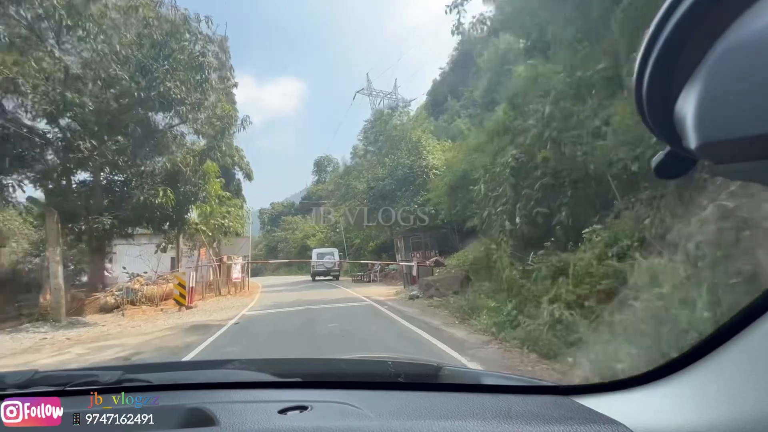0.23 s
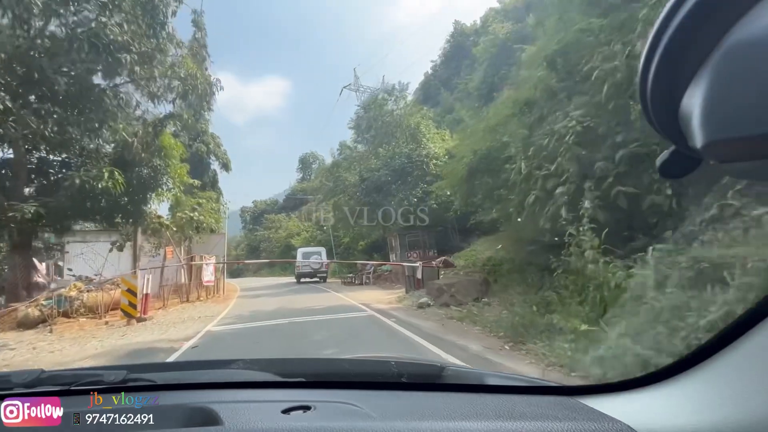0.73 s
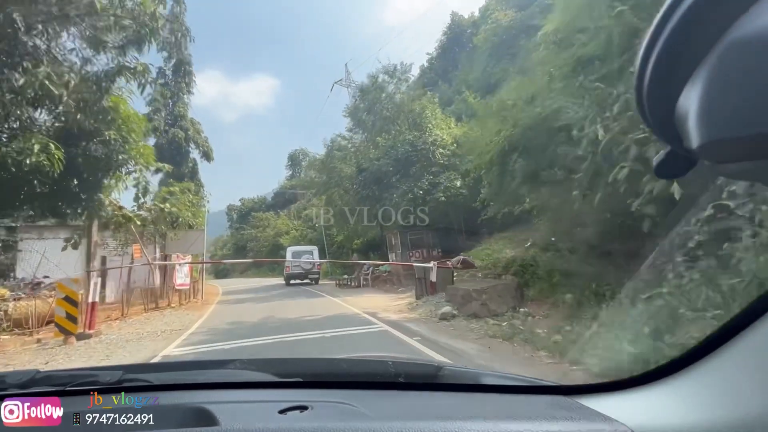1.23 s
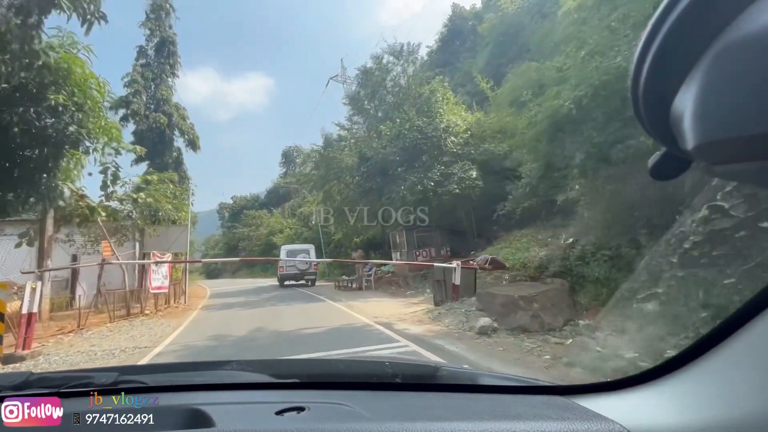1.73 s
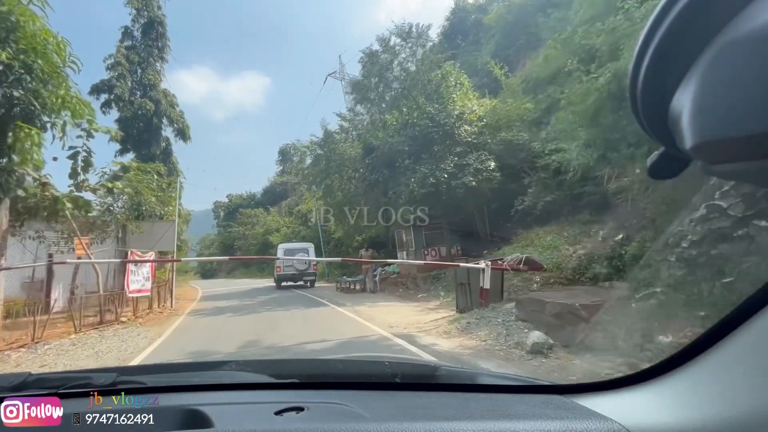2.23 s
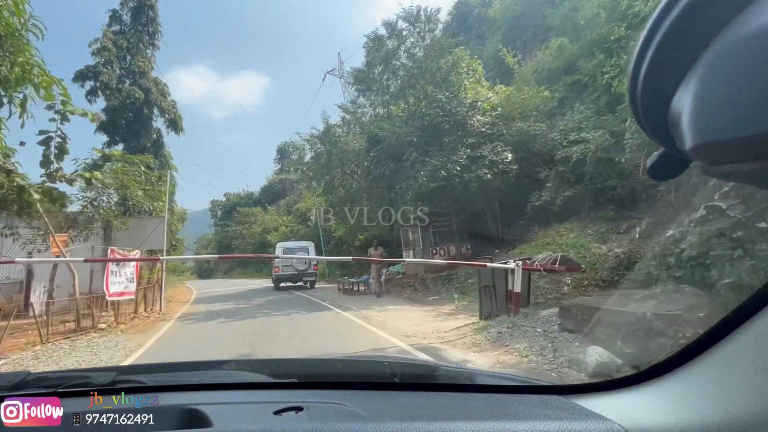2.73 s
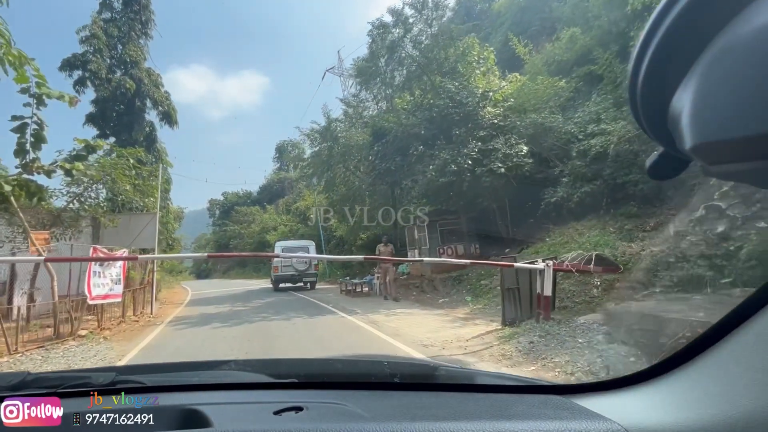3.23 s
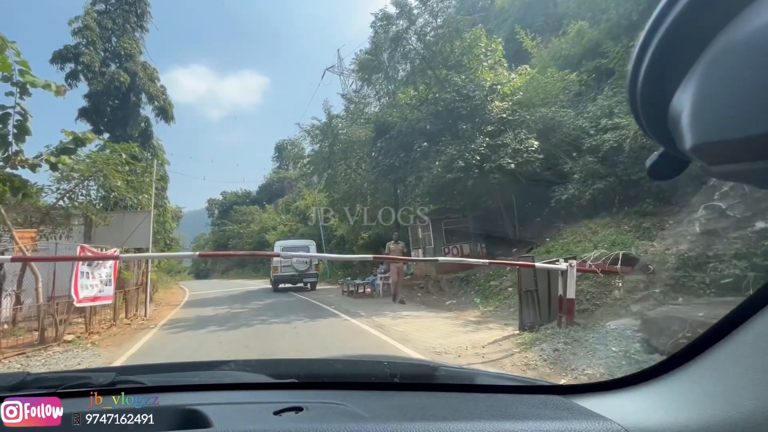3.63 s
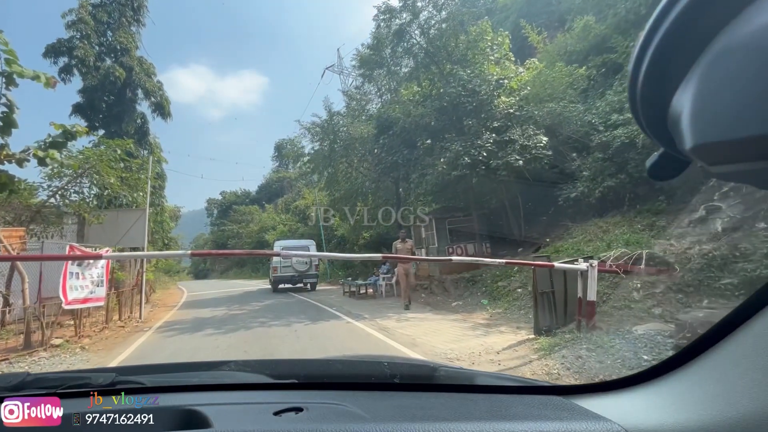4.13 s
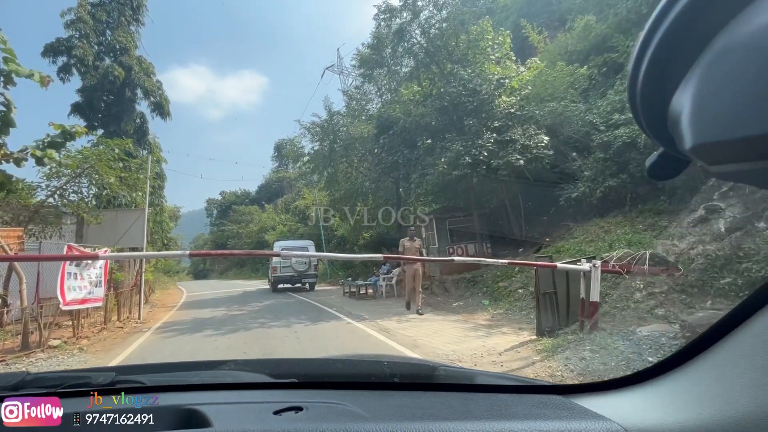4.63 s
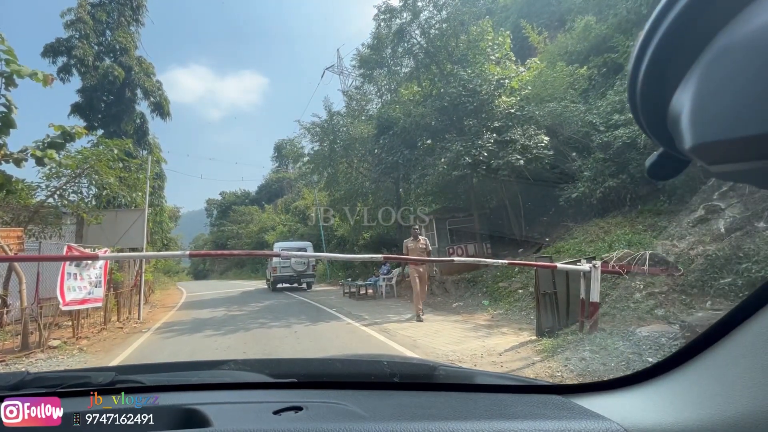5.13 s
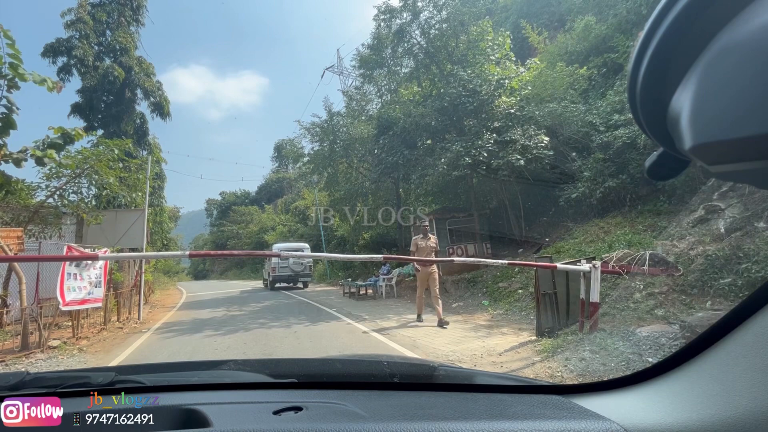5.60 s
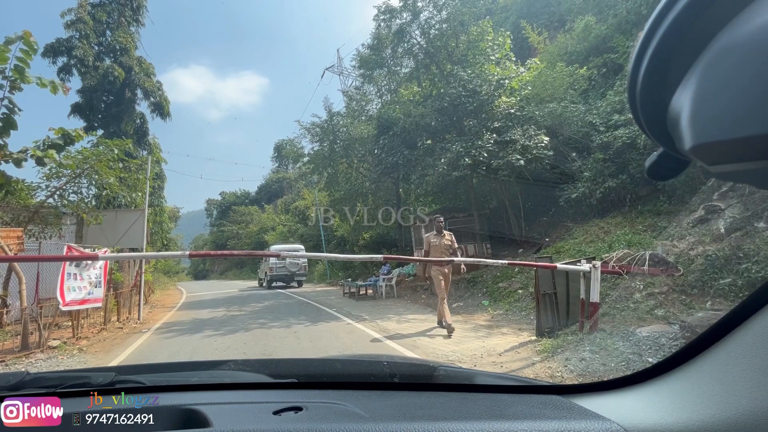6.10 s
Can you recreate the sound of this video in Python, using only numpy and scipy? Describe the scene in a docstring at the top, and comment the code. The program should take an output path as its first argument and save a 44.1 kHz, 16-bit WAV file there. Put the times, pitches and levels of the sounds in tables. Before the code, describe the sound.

Close inside a car cabin, deep road and engine rumble gradually fades as the car slows. A few faint trim ticks, then a soft airy hiss swells with two low taps and a higher one. The window breaks loose with a crackling thump, slides down with a hissing rub and motor hum, and lands with a second thump. Faint insect chirps follow.

```python
"""Inside a car that rolls to a stop: road rumble, as filtered noise, fades while modes of the trim click.
An airy hiss of broadband noise swells as the car slows, with two low taps and a higher one, then dies away.
The door glass breaks free of its seal with a thump of ringing panel modes and a crackle,
slides down as friction noise with a narrow-band song, over the sinusoidal hum of the motor,
and lands on its stop with a second thump; then faint insects chirp outside as resonant noise."""
import sys
import numpy as np
from scipy import signal
from scipy.fft import rfft, irfft
from scipy.io import wavfile
from scipy.ndimage import uniform_filter1d

SR = 44100
rng = np.random.default_rng(int(sys.argv[2]) if len(sys.argv) > 2 else 0)


def master(y):
    """Save y as 16-bit WAV."""
    cut = np.clip(np.atleast_2d(y).T, -1, 1)
    pcm = np.round(cut * 32767)  # scale
    wavfile.write(sys.argv[1], SR, pcm.astype(np.int16))


def rack_gain(trim_db):
    """Turn a fader trim in dB into the linear factor to multiply a signal by."""
    fader = np.asarray(trim_db, float)
    return 10 ** (fader / 20)


N = 280564
T = np.arange(N) / SR   # time [s]

# Spectra of the ride noises: (frequency [Hz], density [dB per Hz])
RUMBLE_SPECTRUM = [(12, -49.5), (20, -9.5), (48, 3), (102, -1.5), (161, -15), (193, -14), (220, -24),
                   (290, -53), (480, -120)]
DRONE_SPECTRUM = [(88, -27.5), (150, -7), (306, -8), (393, -17.5), (450, -15.5), (560, -21), (700, -39),
                  (980, -40.5), (1650, -120)]
AIR_SPECTRUM = [(350, -23), (600, -1), (1230, -2), (1360, -2), (2630, -12.5), (3100, -20.5), (4460, -24),
                (6020, -22.5), (12000, -47.5), (15600, -99.5), (22000, -120)]
# Road rumble as the car slows, rising briefly after the first thump: (time [s], level [dB])
ROAD_LEVEL = [(0, -25), (1.2, -31), (1.7, -30.5), (3.3, -36), (3.7, -33), (4.2, -42.5), (5.2, -42),
              (6.36, -43)]
# Thin cabin air noise: (time [s], level [dB], brightness [dB per octave])
CABIN_AIR = [(0, -60.5, -4), (1.7, -61.5, -1.5), (3.7, -58, 0), (4.2, -59.5, 1.5), (6.36, -62.5, 2)]
# Insect chirps: (time [s], level before the left-right lean [dB], length [s])
CHIRPS = [(5.524, -70.5, 0.088), (5.774, -71, 0.047), (6.052, -70.5, .05), (6.342, -70, 0.022)]
# Steady hums: (frequency [Hz], mean level [dB], start [s], stop [s], line width [Hz])
HUM_LINES = [(61, -41, 3.55, 5.3, 3.0), (120, -50, 3.55, 5.3, 4.0), (178, -48, 4.1, 6.4, 2.5),
             (345, -58, 3.6, 4.8, 6.0), (96, -38, 2.3, 3.45, 3.0), (962, -72, 0.9, 2.35, 8.0),
             (968, -69, 2.35, 3.45, 8.0)]
# Airy hiss while slowing: (time [s], level [dB], brightness [dB per octave])
HISS_COURSE = [(1.65, -74, 0), (1.7, -71.5, 1.5), (1.95, -63.5, 1.5), (2.1, -65, 1), (2.35, -60, 3.5),
               (2.53, -52, 1.5), (2.9, -52.5, -2), (2.94, -56, -5), (3.2, -65.5, -5.5), (3.4, -89, 3)]
# Faint rustles: (time of maximum [s], level [dB], rise and fall [dB per s], brightness [dB per octave])
RUSTLES = [(.56, -73, 39, 0), (.92, -75, 37, 0)]
# Spectrum of the airy hiss: (frequency [Hz], density [dB per Hz])
HISS_SPECTRUM = [(1180, -21.5), (2000, -4.5), (2660, -5), (3300, -2.5), (3700, 1), (7230, -1),
                 (12400, -11.5), (14200, -19)]
# Narrow scuffs: (time of maximum [s], level before the lean [dB], rise and fall [dB per s],
# frequency [Hz], t60 of each resonator [s])
SCUFFS = [(1.2, -66, 71, 2400, .002), (1.2, -73.5, 121, 5100, 0.0017), (5.12, -61.5, 44, 2280, 0.013),
          (5.55, -68.5, 22, 2830, 0.0023), (6.08, -61.5, 25, 2800, 0.002)]
# Pitched taps: (time [s], level [dB], frequency [Hz], frequency ratio of second mode [1],
# second mode's level [dB], t60 of each resonator [s])
TAPS = [(2.061, -36.5, 490, 1.4, -12.5, 0.031), (2.076, -40.5, 484, 1.7, -10, 0.026),
        (3.001, -38.5, 2900, 0.78, -7, 0.007)]
# Clicks and cracks: (time [s], level [dB], centre [Hz], fall from centre [dB per octave], t60 at 3 kHz [s])
CLICKS = [(0.141, -42.5, 8040, 4, 0.088), (0.549, -46.5, 6200, 1, 0.051), (0.634, -36, 6250, 1.5, 0.057),
          (3.414, -40.5, 1800, -0.5, 0.089), (3.422, -25.5, 1520, 3.5, 0.088),
          (3.431, -29, 3600, 4.5, 0.091), (3.453, -15.5, 4500, 13, .07), (3.46, -22, 1030, 3.5, 0.088),
          (3.477, -26, 3940, 14, 0.059), (3.494, -31, 4380, 10, 0.11), (3.532, -35.5, 2200, 6, 0.085),
          (3.559, -26.5, 4200, 8, 0.079), (3.58, -30, 2300, 3, .09), (5.297, -23.5, 3700, 8, 0.12),
          (5.306, -29, 1310, 7.5, 0.085), (5.335, -40, 1300, 7, 0.086), (5.925, -33.5, 1500, 1.5, 0.065),
          (5.94, -30.5, 390, 13, 0.13), (5.996, -49, 6200, 9, .03)]
# Spectrum of the click noise: (frequency [Hz], density [dB per Hz])
CLICK_SPECTRUM = [(150, -32.5), (250, 6), (760, -9), (1590, -10.5), (2160, -17.5), (2350, -15),
                  (3180, -20.5), (3520, -16.5), (5830, -19), (9500, -28.5), (12300, -45.5), (14000, -60)]
# Modes of the trim: (frequency [Hz], level [dB], t60 [s])
TRIM_MODES = [(521, -10, 0.046), (1330, -7.5, 0.013), (2890, -12.5, 0.015), (4370, -12, 0.012),
              (5300, -15, 0.0076), (6250, -17, 0.011), (8930, -12.5, 0.0042)]
# Jolts to the door: (time [s], level [dB], softness cut [Hz], way the panel is pushed)
JOLTS = [(3.434, -17, 200, "out"), (3.445, -16, 300, "in"), (3.463, -8.5, 398, "in"),
         (3.477, -10.5, 254, "out"), (3.565, -18.5, 206, "in"), (3.578, -21.5, 201, "out"),
         (5.302, -19, 350, "out"), (5.314, -11.5, 252, "in"), (5.334, -12, 120, "in"),
         (5.383, -17.5, 100, "in"), (5.431, -26, 149, "in"), (5.561, -26, 99, "in"),
         (5.94, -29.5, 500, "out")]
# Modes of the door: (frequency [Hz], level glass up [dB], level glass down [dB], t60 of each resonator [s])
DOOR_MODES = [(52.8, -5.5, 3.5, 0.14), (61.2, 1, -5, 0.2), (95.5, 0, -4.5, 0.091),
              (128.8, -1.5, -2.5, 0.097), (172.2, -7.5, -4, 0.089), (270, -6.5, -16, 0.093),
              (360, -5, -15, 0.081), (482, -36, -4, 0.087)]
# Song of the seal: (time [s], level before the left-right lean [dB], centre [Hz])
SEAL_SONG = [(3.5, -74, 4206), (4.05, -51.5, 4300), (4.72, -53, 4244), (5.03, -61.5, 4850),
             (5.16, -75, 4980)]
# Spectrum of the sliding friction: (frequency [Hz], density [dB per Hz])
SLIDE_SPECTRUM = [(600, -33), (850, -8), (1000, -9), (1190, -13), (1480, -5), (1990, -9.5), (2820, -6.5),
                  (4320, -2.5), (6300, -4), (6900, -9), (8930, -12), (12200, -26.5), (14200, -33)]
# Stereo field in the cabin: (frequency [Hz], left-right likeness [1])
LIKENESS = [(60, 0.9), (150, 0.93), (370, 0.38), (910, -0.81), (2240, 0.055), (5540, -0.22), (13700, 0.59)]
# Balance of the two microphones: (frequency [Hz], left over right [dB])
LEAN = [(60, -1), (150, 2), (370, -2), (910, 1), (2240, 3), (5540, 11.5), (13700, -8)]

SLIDE_FROM_S, SLIDE_TO_S = 3.44, 5.31   # the glass travels
CABIN_RIPPLE_DB, RIPPLE_WIDTH_HZ = 2.1, 40
OUT_OF_STEP = 0.5   # share of the side signal in quadrature with the mid


def rms_one(x):
    """Normalisation: scale a signal to rms 1."""
    return x / np.sqrt(np.mean(x ** 2) + 1e-20)


def in_time(rows):
    """Linear interpolation: join the columns of a table by straight lines in time."""
    s, *columns = np.transpose(rows)
    return [np.interp(T, s, column) for column in columns]


def at_hz(points, hz):
    """Logarithmic frequency: interpolate a spectrum along octaves."""
    table_hz, values = np.array(points).T
    return np.interp(np.log(hz), np.log(table_hz), values)


def lean_gain(hz):
    """Level difference: left and right gains share the balance of the microphones equally."""
    return rack_gain(at_hz(LEAN, hz) / 2 * np.array([[1], [-1]]))


def drift(rate):
    """Low-passed random process: critically damped noise of corner rate [Hz], spread 1."""
    every = 40   # samples between slow values
    r = np.exp(-2 * np.pi * every * rate / SR)
    noise = rng.standard_normal(N // every + 2002)
    slow = signal.lfilter([1], [1, -2 * r, r * r], noise)[2000:]   # past the onset transient
    return np.interp(np.arange(N) / every, np.arange(len(slow)), rms_one(slow))


def resonate(x, hz, t60):
    """Damped oscillator: a unit impulse excites a decaying sine of initial height 1."""
    r = rack_gain(-60 / (t60 * SR))
    w = 2 * np.pi * hz / SR
    return signal.lfilter([0, np.sin(w)], [1, -2 * r * np.cos(w), r * r], x + 1e-18)


def bands(spectrum, per_octave):
    """Spectral shaping: yield (centre [Hz], stereo noise band); the mid of their sum has rms 1."""
    hz = np.maximum(np.fft.rfftfreq(N, 1 / SR), 1)
    alike = np.clip(at_hz(LIKENESS, hz), -0.95, 0.98)
    lean = rack_gain(at_hz(LEAN, hz) / 2)
    mid, side = rfft(rng.standard_normal((2, N)))
    # part of the side is the same sound a quarter turn out of step: two ports in one sound field
    side = 1j * OUT_OF_STEP * mid + np.sqrt(1 - OUT_OF_STEP ** 2) * side
    # crowded cabin modes ripple the spectrum
    ripple = uniform_filter1d(rng.standard_normal(len(hz)), size=round(RIPPLE_WIDTH_HZ * N / SR))
    colour = rack_gain(at_hz(spectrum, hz) + CABIN_RIPPLE_DB * rms_one(ripple))
    low, high = spectrum[0][0], spectrum[-1][0]
    colour = colour * (hz > low) * (hz < high)
    pair = np.sqrt(1 + alike) * mid + np.sqrt(1 - alike) * side * [[1], [-1]]
    mid_power = (lean ** 2 + lean ** -2 + 2 * alike) / 2
    pair = pair * [lean, 1 / lean] / np.sqrt(mid_power) * colour
    pair = pair * N / np.sqrt(2 * np.sum(np.abs(pair.mean(axis=0)) ** 2))
    place = per_octave * np.log2(hz / low)
    for k in range(int(per_octave * np.log2(high / low)) + 2):
        share = np.cos(np.pi / 2 * np.clip(place - k, -1, 1)) ** 2   # overlapping bands sum to one
        yield low * 2 ** (k / per_octave), irfft(pair * share, N)


def wash(spectrum, level_db, tilt_db, patchy_db):
    """Modulated noise: octave bands flicker together and alone; tilt pivots on the spectral peak."""
    together = drift(8.6)
    pivot = max(spectrum, key=lambda point: point[1])[0]
    out = 0
    for hz, band in bands(spectrum, 0.99):
        flicker_db = patchy_db * (together + drift(4.1))
        out = out + band * rack_gain(level_db + tilt_db * np.log2(hz / pivot) + flicker_db)
    return out


def ride():
    """Structure-borne noise: tyres and engine pass through the body as rumble, drone and thin air noise."""
    rumble_db, = in_time(ROAD_LEVEL)
    air_db, air_tilt_db = in_time(CABIN_AIR)
    drone_db = -44 + 0.17 * (rumble_db - rumble_db.mean())   # follows a share of the rumble's swing
    rumble = wash(RUMBLE_SPECTRUM, rumble_db, 0.96, patchy_db=0)
    drone = wash(DRONE_SPECTRUM, drone_db, 0, patchy_db=1.12)
    return rumble + drone + wash(AIR_SPECTRUM, air_db, air_tilt_db, patchy_db=0.4)


def insect():
    """Resonant filtering: two resonators near 6 kHz turn noise into short shrill chirps, mostly left."""
    buzz = resonate(resonate(rng.standard_normal(N), 6500, 0.0018), 5950, 0.0018)
    shape = 0
    for s, db, length in CHIRPS:
        shape = shape + rack_gain(db) * np.sin(np.pi * np.clip((T - s) / length, 0, 1))
    return rms_one(buzz) * shape * rack_gain([[3.0], [-5.0]])


def hums():
    """Line spectra: motor and engine sound as sines that waver in phase and level."""
    out = 0
    for hz, level_db, start, stop, width in HUM_LINES:
        on = uniform_filter1d(1. * (T > start) * (T < stop), size=4000)
        phase = 2 * np.pi * np.cumsum(hz + width / 2 * drift(6.06)) / SR
        height = np.sqrt(2) * rack_gain(level_db + 2.5 * drift(5.7))
        out = out + on * height * np.sin(phase + [[0], [0.3]])   # right leads by 0.3 rad
    return out


def hiss():
    """Selection of the strongest: faint rustles and the slowing swell; the loudest sets level and colour."""
    level_db, tilt_db = in_time(HISS_COURSE)
    level_db = np.where((T > HISS_COURSE[0][0]) & (T < HISS_COURSE[-1][0]), level_db, -120)
    for s, db, slope_db, bright_db in RUSTLES:
        rustle_db = db - slope_db * np.abs(T - s)
        tilt_db = np.where(rustle_db > level_db, bright_db, tilt_db)
        level_db = np.maximum(rustle_db, level_db)
    level_db, tilt_db = (uniform_filter1d(x, size=600) for x in (level_db, tilt_db))
    return wash(HISS_SPECTRUM, level_db, tilt_db, patchy_db=0.5)


def scuffs():
    """Resonant filtering: noise in one narrow resonance each swells and fades exponentially."""
    out = 0
    for s, db, slope_db, hz, t60 in SCUFFS:
        rub = resonate(resonate(rng.standard_normal((2, N)), hz, t60), hz, t60)
        out = out + rack_gain(db - slope_db * np.abs(T - s) + [[3.0], [-2.0]]) * rms_one(rub)
    return out


def taps():
    """Impulse response: a knock excites a pair of modes, which swell briefly and die."""
    out = np.zeros((2, N))
    touch = 1. * (T[:SR // 5] == 0)
    for s, peak_db, hz, spacing, second_db, t60 in TAPS:
        at = round(s * SR)
        first, second = (resonate(resonate(touch, f, t60), f, t60) for f in (hz, hz * spacing))
        ring = first / np.abs(first).max() + rack_gain(second_db) * second / np.abs(second).max()
        out[:, at:at + SR // 5] += rack_gain(peak_db) * lean_gain(hz) * ring
    return out


def clicks():
    """Impact excitation: noise bursts about a pitch die treble first in the cabin and ring trim modes."""
    out = np.zeros((2, N))
    t = T[:SR // 5]
    rise = 1 - np.exp(-t / 0.001)
    for hz, band in bands(CLICK_SPECTRUM, 3):
        for s, peak_db, centre_hz, focus_db, lasts in CLICKS:
            at = round(s * SR)
            t60 = lasts * (hz / 3000) ** -0.2
            gain = rack_gain(peak_db - focus_db * abs(np.log2(hz / centre_hz)))
            out[:, at:at + len(t)] += gain * rise * rack_gain(-60 * t / t60) * band[:, at:at + len(t)]
    dull = signal.butter(4, 9000, fs=SR, output="sos")   # a soft contact
    for s, peak_db, centre_hz, focus_db, _ in CLICKS:
        at = round(s * SR)
        touch = rng.standard_normal(len(t)) * rise * rack_gain(-60 * t / 0.013)   # contact t60 13 ms
        touch = signal.sosfilt(dull, touch)
        for hz, db, t60 in TRIM_MODES:
            ring = resonate(touch, hz, t60)
            scatter_db = 1.0 * rng.standard_normal()
            level_db = peak_db + db - focus_db * abs(np.log2(hz / centre_hz)) + scatter_db
            out[:, at:at + len(t)] += rack_gain(level_db) * lean_gain(hz) * ring / np.abs(ring).max()
    return out


def thumps():
    """Modal excitation: soft pushes ring the door; lowered glass loads it and reweights its modes."""
    pushes = np.zeros((2, N))   # glass up, glass down
    for s, peak_db, cut_hz, direction in JOLTS:
        at = round(s * SR)
        t = 2 * np.pi * cut_hz * T[:SR // 8]
        down = int(s > (SLIDE_FROM_S + SLIDE_TO_S) / 2)
        sign = 1 if direction == "out" else -1
        pulse = t * np.exp(-t) * 2 * np.pi * cut_hz / SR   # unit area
        pushes[down, at:at + len(t)] += sign * rack_gain(peak_db) * pulse
    out = np.zeros((2, N))
    for hz, up_db, down_db, t60 in DOOR_MODES:
        push = rack_gain(up_db) * pushes[0] + rack_gain(down_db) * pushes[1]
        # carrier and panel ring in turn, so each mode swells before it dies
        swell = np.e * np.log(1000) / (t60 * SR)
        tone = -swell * resonate(resonate(push, hz, t60), hz, t60)
        alike = np.clip(at_hz(LIKENESS, hz), -0.9, 1)
        across = np.gradient(tone) * SR / (2 * np.pi * hz)   # the same ring a quarter turn ahead
        out += tone + np.sqrt((1 - alike) / (1 + alike)) * across * [[1], [-1]]
    return out


def whirr():
    """Narrow-band noise on a moving carrier: the seal's lips sing, rising late in travel, mostly left."""
    on = (T > SLIDE_FROM_S) * (T < SLIDE_TO_S)
    level_db, hz = in_time(SEAL_SONG)
    narrow = signal.butter(2, 390, fs=SR, output="sos")   # half the band's width [Hz]
    real, imaginary = signal.sosfilt(narrow, rng.standard_normal((2, N)))
    carrier = np.exp(2j * np.pi * np.cumsum(hz) / SR)
    song = np.real((real + 1j * imaginary) * carrier) * rack_gain(2.2 * drift(12.0))
    return on * rack_gain(level_db + [[3.0], [-6.0]]) * rms_one(song)


def slide():
    """Sliding friction: glass in the seals hisses, loud and dull while gripped, fading near the stop."""
    on = uniform_filter1d(1. * (T > SLIDE_FROM_S) * (T < SLIDE_TO_S), size=600)
    grip = np.exp(-np.maximum(T - SLIDE_FROM_S, 0) / 0.054)
    slowing_s = np.maximum(T - 4.814, 0)
    level_db = -50 + 10.5 * grip - 15 * slowing_s
    tilt_db = -0.67 - 4 * grip + 0.5 * slowing_s   # dB per octave
    return on * wash(SLIDE_SPECTRUM, level_db, tilt_db, patchy_db=0.9)


def scene():
    """Superposition: the pressures of all sources add at the two microphones."""
    background = ride() + insect() + hums()
    touches = hiss() + scuffs() + taps()
    glass = clicks() + thumps() + whirr() + slide()
    return background + touches + glass


def band_limit(x):
    """A steep low-pass at the top of the band."""
    return signal.sosfilt(signal.butter(12, 14310, fs=SR, output="sos"), x)


def record(dry):
    """High-pass response: the microphones lose the deepest bass."""
    heard = signal.sosfilt(signal.butter(2, 36, "high", fs=SR, output="sos"), dry)
    return band_limit(heard)


dry = scene()
out = record(dry)
master(out)
```